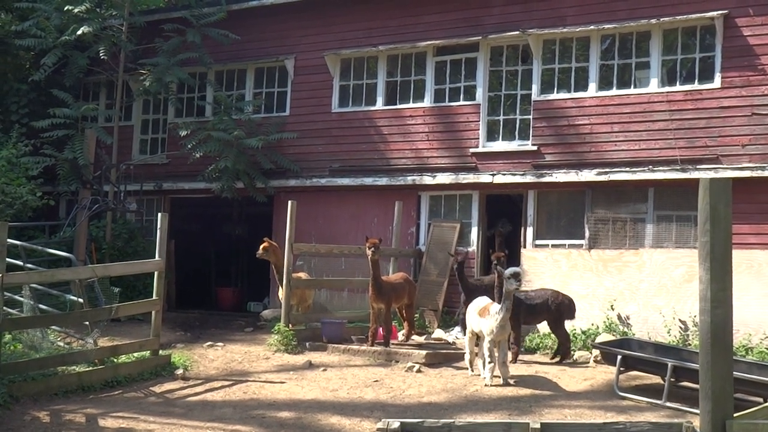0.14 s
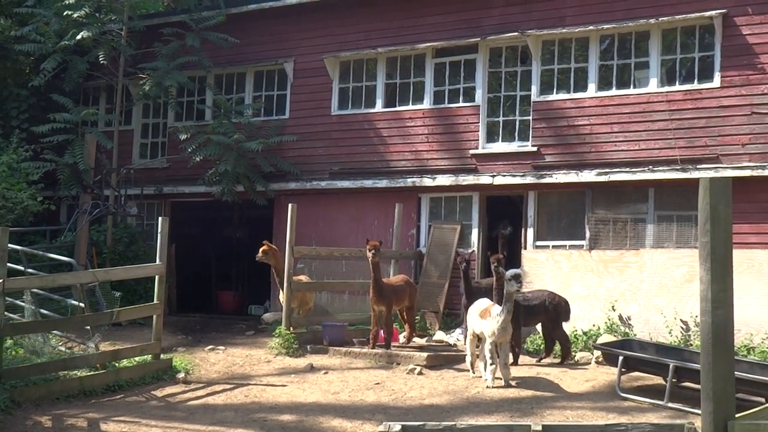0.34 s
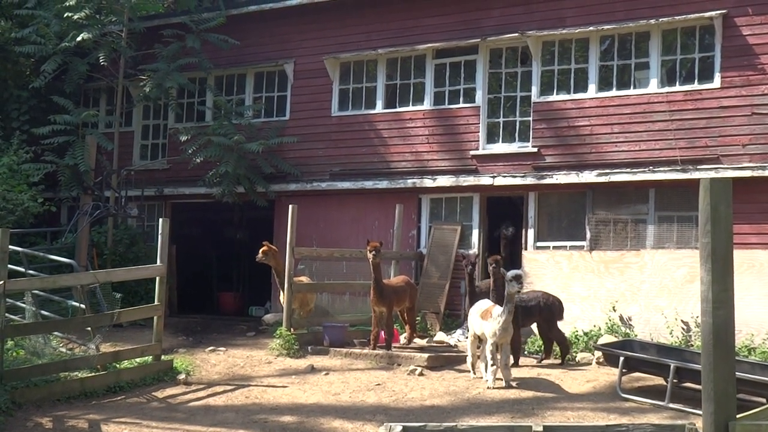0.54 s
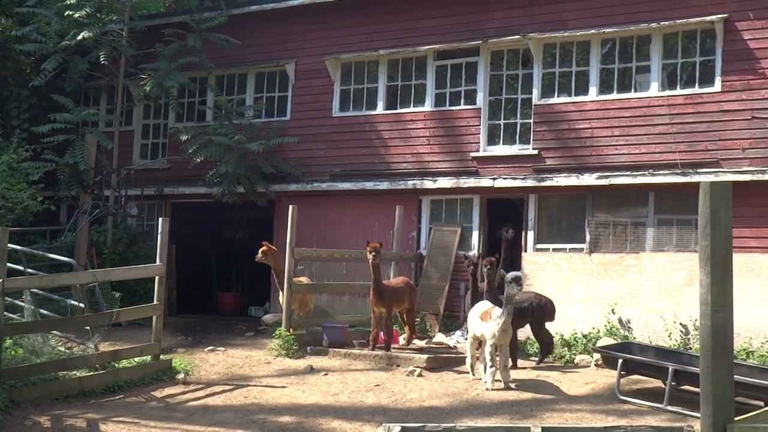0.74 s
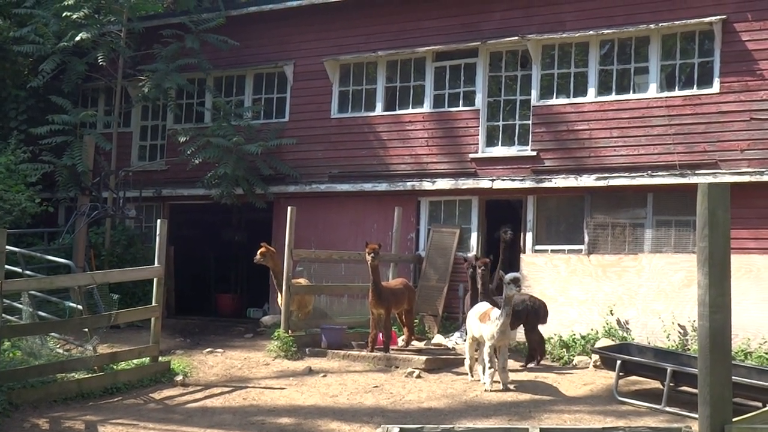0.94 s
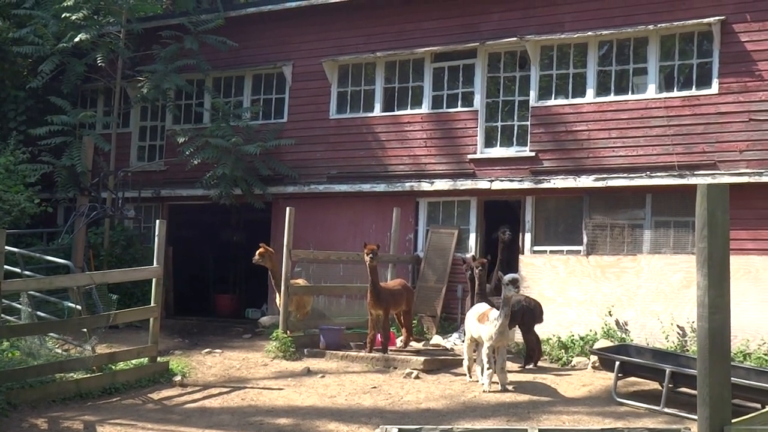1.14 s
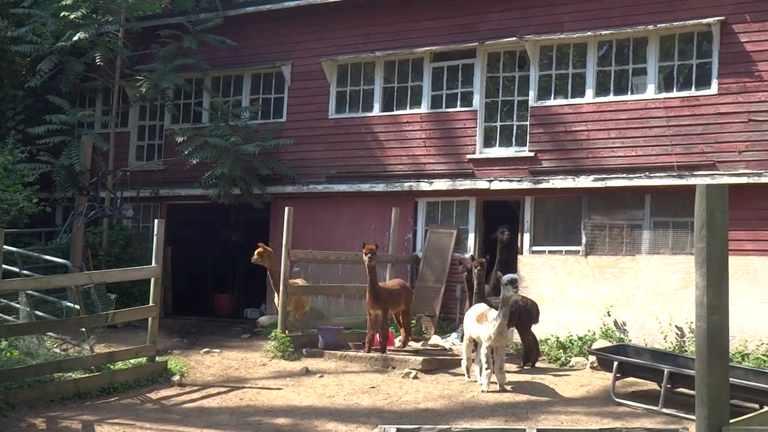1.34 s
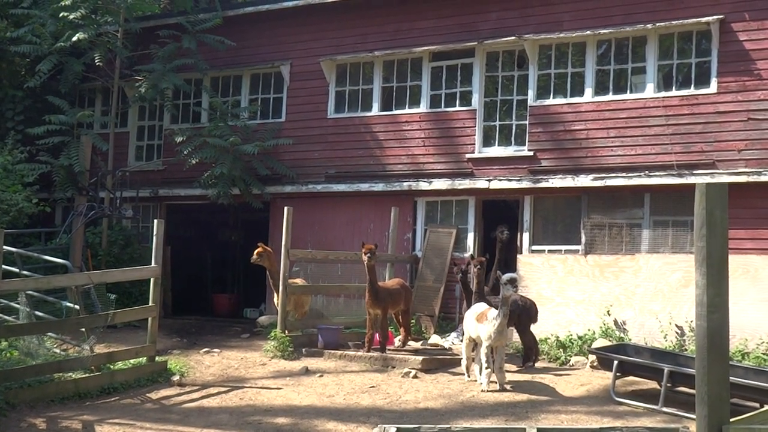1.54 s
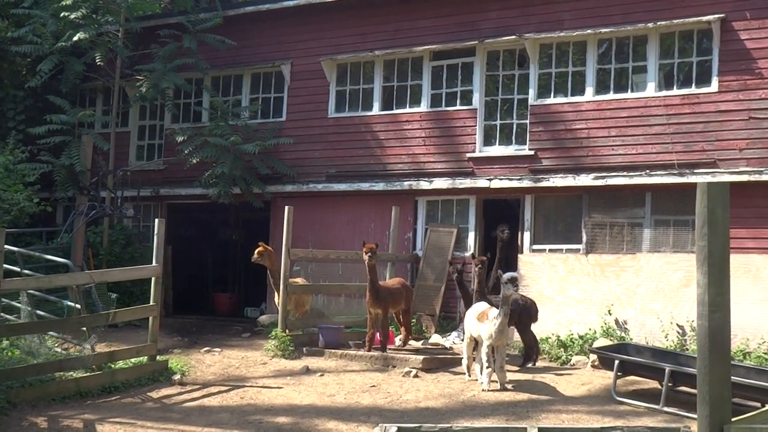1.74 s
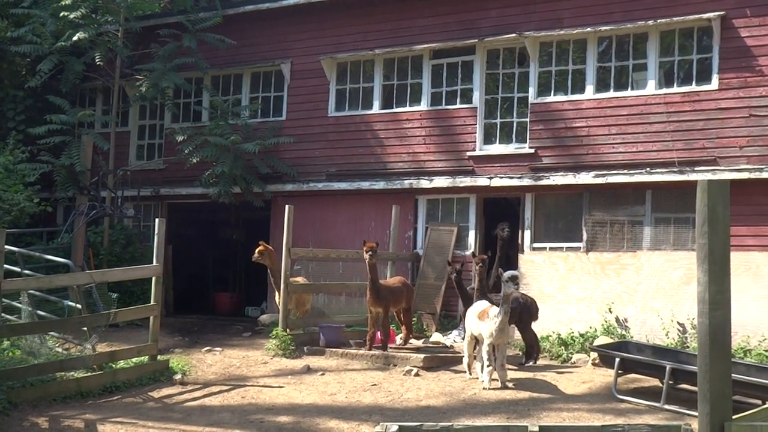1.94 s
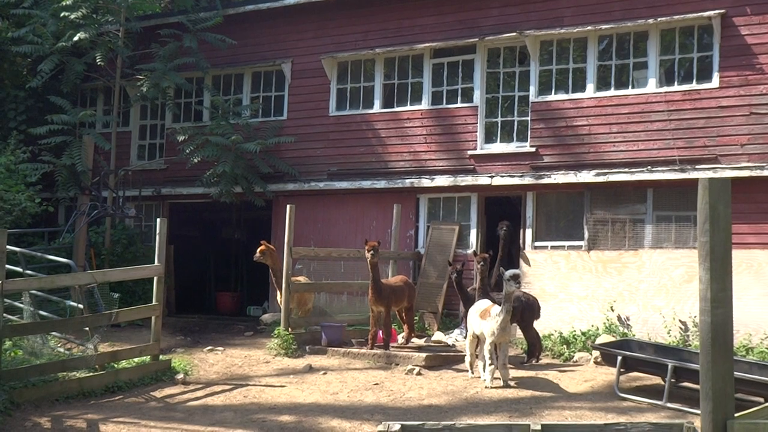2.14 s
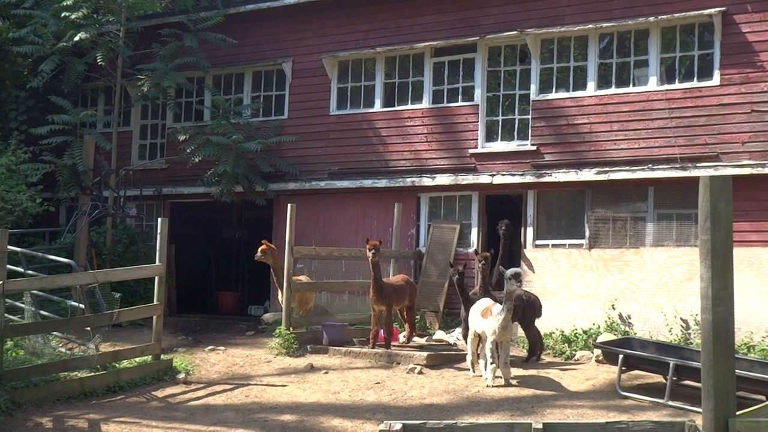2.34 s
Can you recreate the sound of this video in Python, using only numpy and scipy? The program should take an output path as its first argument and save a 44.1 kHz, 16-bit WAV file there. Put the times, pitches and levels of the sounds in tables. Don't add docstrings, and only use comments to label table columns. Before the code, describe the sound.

Loud shrill alpaca alarm calls repeat about four per second, squeaky breaths between, echoing off a barn.

```python
import sys
import numpy as np
from scipy import signal
from scipy.fft import rfft, irfft
from scipy.io import wavfile
from scipy.ndimage import map_coordinates

SR = 44100
rng = np.random.default_rng(int(sys.argv[2]) if len(sys.argv) > 2 else 0)


def natural_amplitude(level_db):
    exponent = np.asarray(level_db, float) / 20
    return 10 ** exponent


def put_to_file(sound):
    columns = np.atleast_2d(sound).T
    safe = np.clip(columns, -1, 1)
    whole_steps = np.round(safe * 32767)
    wavfile.write(sys.argv[1], SR, whole_steps.astype(np.int16))


N = 105840

# t/s, length/s, level/dB, top f/Hz, roughness/0-1
HONKS = [
    (.175, 0.15, -37, 430, 0.5),
    (.398, .135, -32.5, 400.8, .7),
    (.645, 0.13, -36, 425.4, 0.51),
    (.89, 0.13, -36, 424.8, 0.54),
    (1.14, .12, -37.5, 424.4, 0.54),
    (1.42, 0.1, -34.5, 397.7, .4),
    (1.7, .125, -35.5, 394.1, 0.42),
    (1.885, 0.14, -37, 387, 0.33),
    (2.235, .14, -37.5, 386, 0.31),
]
# t/s, length/s, level/dB, top f/Hz, roughness/0-1
WHISTLES = [
    (.197, 0.1, -21.5, 1896, 0.37),
    (0.412, 0.056, -28.5, 1796, 1.2),
    (0.488, 0.0182, -36, 1876, .95),
    (0.659, .072, -19.5, 1876, 0.35),
    (0.906, 0.0634, -19, 1849, 0.17),
    (1.161, 0.051, -20, 1825, 0.07),
    (1.437, 0.042, -24, 1816, 0.2),
    (.741, 0.0078, -39, 1852, 0.6),
    (1.218, 0.017, -32.5, 1834, 0.3),
    (1.737, 0.011, -27.5, 1811, 0.3),
]
# centre t/s, length/s, f/Hz, level/dB
CATCHES = [(.421, .016, 3600, -28), (.423, .009, 5300, -30), (.439, .017, 5350, -26),
           (.437, .012, 4200, -31), (.455, .011, 1950, -29), (.463, .015, 5150, -29),
           (.47, .008, 3550, -25), (.497, .015, 4000, -27), (.493, .01, 1950, -31), (.512, .009, 1950, -28),
           (.517, .011, 4200, -32), (.45, .05, 410, -47)]
# t/s, length/s, level/dB, top f/Hz, roughness/0-1
OPENING = [
    (.005, .165, -45, 586, 0.23),
]
# t/s, length/s, level/dB, top f/Hz, roughness/0-1
GASPS = [
    (1.27, .115, -40.5, 582, 0.01),
    (1.555, 0.12, -38, 593, 0.06),
    (2.055, 0.15, -33.5, 604, 0.02),
]
# t/s, length/s, level/dB, top f/Hz, roughness/0-1
HUMS = [
    (.32, .08, -58, 557, .1),
    (.55, 0.12, -54, 558, 0),
    (.79, 0.089, -47.5, 552.6, 0.02),
    (1.02, 0.13, -51, 545, 0.2),
]
# level/dB of the sidebands -1, 0, +1, +2, +3 times the fold rate
PARTIALS = [
    (-20, 0.5, -6.5, -13, -12),
    (-42, 1, -1, -10.5, -11.5),
    (-16, -8, -10.5, -15, -22),
    (-40, -42, -20.5, -29, -30.5),
]
# f/Hz, level/dB
HONK_THROAT = [(220, -57), (390, -2.5), (800, -5.5), (1450, -7.5), (2100, 5.5), (3300, 0), (5300, -4.5),
               (9500, -48)]
GASP_THROAT = [(600, -17.5), (1800, -6.5), (2400, -11), (3000, 8), (4800, -6), (5500, -40), (12600, -33),
               (14000, -16)]
HUM_THROAT = [(300, -20), (550, 1.5), (1100, 6), (1600, -31)]
RASP_THROAT = [(1100, -40), (1900, -56), (2900, -10), (4100, 2.5), (5800, -6.5), (7600, -11), (11500, -40),
               (14000, -29.5)]
# f/Hz, level/dB
YARD_COLOUR = [(300, -7.5), (1800, -3.5), (3700, -5.5), (5700, 0), (8000, -5), (12000, -30)]
# f/Hz, level/dB
FLOOR = [(25, -15), (60, -4), (250, -6.5), (1000, -6), (1600, -15), (3000, -13), (6000, -13.5),
         (15500, -29.5)]
# f/Hz, width/Hz, level/dB, flicker/dB
BANDS = [
    (7800, 420, -50, 1.5),
    (10185, 340, -55, 1.6),
    (14200, 1000, -68, 4),
    (127, 28.5, -56.5, 1),
    (56, 7.7, -71, 5),
]
# f/Hz, likeness/0-1
LIKE = [(60, 1), (200, 1), (500, 0.82), (1500, .8), (4000, .85), (11000, 0.91)]
# f/Hz, phase/rad
PORT_LEAD = [(40, -0.019), (150, -0.89), (400, -1.51), (1600, -1.46), (4200, -0.69), (9000, -0.31),
             (12000, -0.2)]

HONK_EDGE_S, GASP_EDGE_S, OPENING_EDGE_S = 0.023, 0.049, 0.028
HONK_SAG, GASP_SAG, HUM_SAG, OPENING_SAG = .16, .15, 0.053, 0.73
SAG_POWER, PEAK_AT = 2.6, .5
FALL_SHARE = .6
HOARSE = .55
AIR_SHARE = .55
JITTER, DRIFT, SHIMMER_DB = .024, .014, 5
ATTACK_S, RELEASE_S, FADE_DB = 0.012, .008, -0.5
ONSET_HZ, RISE_S = 1826.5, .03
WOBBLE_DB, THROB_DB = 2.2, 2.5
SIDEBANDS = range(-1, 4)
SNAP_DB, SNAP_HZ, SNAP_WIDTH_HZ, SNAP_S = -37.5, 7900, 2500, 0.0019
YARD_DB, YARD_T60_S, YARD_GAP_S, YARD_LIKE = -10.5, 1, 0.0069, 0.95
NEAR_DB, NEAR_T60_S = 13.5, 0.05
STIR_S = .00017
FLOOR_DB = -48.5
PAN_DB = -0.8


def read(table, hz):
    a = np.array(table, float)
    return np.interp(np.log(np.maximum(hz, 1)), np.log(a[:, 0]), a[:, 1])


def unit(x):
    return x / np.sqrt(np.mean(x ** 2) + 1e-20)


def shape(x, gain):
    n = x.shape[-1]
    return irfft(rfft(x) * gain(np.fft.rfftfreq(n, 1 / SR)), n)


def walk(rate):
    return unit(shape(rng.standard_normal(N), lambda f: 1 / (1 + (f / rate) ** 4)))


def alpaca(t):
    hz, gain, rough = breath(HONKS, HONK_SAG, HONK_EDGE_S, t, FALL_SHARE)
    honk, fold = buzz(hz, gain, np.maximum(rough, HOARSE), HONK_THROAT, count=19)
    opening = breath(OPENING, OPENING_SAG, OPENING_EDGE_S, t, FALL_SHARE)
    first, _ = buzz(*opening, GASP_THROAT, count=11)
    gasp, _ = buzz(*breath(GASPS, GASP_SAG, GASP_EDGE_S, t), GASP_THROAT, count=24)
    hum, _ = buzz(*breath(HUMS, HUM_SAG, GASP_EDGE_S, t), HUM_THROAT, count=3)
    return honk + whistle(fold, t) + catches(t) + first + gasp + hum


def breath(rows, sag, edge_s, t, fall=1):
    hz, gain, rough = np.full(N, 400.), np.zeros(N), np.zeros(N)
    for s, length, db, top, r in rows:
        on = (t >= s) & (t < s + length)
        u = t[on] - s
        side = np.where(u > PEAK_AT * length, fall, 1)
        arch = np.abs(2 * (u / length - PEAK_AT)) ** SAG_POWER
        hz[on] = top * (1 - sag * side * arch)
        edge = np.clip(np.minimum(u, length - u) / edge_s, 0, 1)
        gain[on] = natural_amplitude(db) * np.sin(np.pi / 2 * edge) ** 2
        rough[on] = np.clip(r, 0, 1)
    return hz, gain, rough


def buzz(hz, gain, rough, throat, count):
    hz = hz * (1 + JITTER * (0.088 + rough) * walk(113.3) + DRIFT * rough * walk(27.7))
    phase = 2 * np.pi * np.cumsum(hz) / SR
    flicker = SHIMMER_DB * walk(40)
    tone, power = np.zeros(N), np.zeros(N)
    for k in range(1, count + 1):
        size = natural_amplitude(read(throat, k * hz))
        own_flicker = natural_amplitude(rough * np.roll(flicker, rng.integers(N)))
        tone += size * own_flicker * np.cos(k * phase - 0.0603 * (k - 1) ** 2)
        power += size ** 2 / 2
    tone = tone / np.sqrt(power) * natural_amplitude(SHIMMER_DB * rough * walk(154))
    return voice(tone, phase, throat, gain, rough), phase


def voice(tone, phase, throat, gain, rough):
    puff = np.exp(0.76 * np.cos(phase)) * rng.standard_normal(N)
    air = unit(shape(puff, lambda f: natural_amplitude(read(throat, f))))
    return gain * (np.sqrt(1 - AIR_SHARE * rough) * tone + np.sqrt(AIR_SHARE * rough) * air)


def whistle(fold, t):
    hz, gain, rough = np.full(N, 1. * ONSET_HZ), np.zeros(N), np.zeros(N)
    for s, length, db, top, r in WHISTLES:
        on = (t >= s) & (t < s + length + 4 * RELEASE_S)
        u = t[on] - s
        start = min(ONSET_HZ, top - 10)
        hz[on] = top + (start - top) / (1 + (u / RISE_S) ** 4)
        attack = np.minimum(u / ATTACK_S, 1)
        release = np.exp(-np.maximum(u - length, 0) / RELEASE_S)
        gain[on] = natural_amplitude(db + FADE_DB * np.minimum(u / length, 1)) * attack * release
        rough[on] = np.clip(r, 0, 1)
    phase = 2 * np.pi * np.cumsum(hz * (1 + 0.0088 * rough * walk(100))) / SR
    wobble = natural_amplitude(WOBBLE_DB * walk(49))
    tone = np.zeros(N)
    for m, row in enumerate(PARTIALS, 1):
        for k, db in zip(SIDEBANDS, row):
            own_wobble = np.roll(wobble, rng.integers(N))
            tone += natural_amplitude(db) * own_wobble * np.cos(m * phase + k * fold + 2 * np.pi * rng.random())
    tone = tone / np.sqrt(np.sum(natural_amplitude(np.array(PARTIALS)) ** 2) / 2)
    return voice(tone, fold, RASP_THROAT, gain * natural_amplitude(THROB_DB * rough * walk(68)), rough)


def catches(t):
    rings, snaps = np.zeros(N), np.zeros(N)
    waver = np.cumsum(1 + 0.024 * walk(100)) / SR
    for s, length, hz, db in CATCHES:
        bell = np.exp(-(2 * (t - s) / length) ** 2)
        rings += natural_amplitude(db + 3) * bell * np.sin(2 * np.pi * hz * waver)
        snaps += np.exp(-np.abs(t - s) / SNAP_S)
    air = unit(shape(rng.standard_normal(N), lambda f: 1 / (1 + ((f - SNAP_HZ) / SNAP_WIDTH_HZ) ** 4)))
    return rings + natural_amplitude(SNAP_DB) * snaps * air


def pair(like):
    mid = shape(rng.standard_normal(N), lambda f: np.sqrt((1 + like(f)) / 2))
    side = shape(rng.standard_normal(N), lambda f: np.sqrt((1 - like(f)) / 2))
    return np.array([mid + side, mid - side])


def yard(x, t):
    decay = natural_amplitude(-60 * t / YARD_T60_S) + natural_amplitude(NEAR_DB - 60 * t / NEAR_T60_S)
    tail = pair(lambda f: YARD_LIKE + 0 * f) * natural_amplitude(2 * walk(60)) * decay
    gap = np.clip(t / YARD_GAP_S - .5, 0, 1)
    tail = shape(tail * gap, lambda f: natural_amplitude(read(YARD_COLOUR, f)))
    tail = tail / np.sqrt(np.sum(tail ** 2) / 2)
    stirred = map_coordinates(x, [(t + STIR_S * walk(30.04)) * SR], mode="nearest")
    return natural_amplitude(YARD_DB) * signal.fftconvolve(tail, stirred[None], axes=1)[:, :N]


def field():
    like = lambda f: np.clip(read(LIKE, f), 0, 1)
    hush = unit(shape(pair(like), lambda f: natural_amplitude(read(FLOOR, f))))
    out = natural_amplitude(FLOOR_DB + 0.4 * walk(0.67)) * hush
    for hz, width, db, flicker_db in BANDS:
        band = shape(pair(like), lambda f: 1 / (1 + ((f - hz) / width) ** 2) ** 1.02)
        out = out + natural_amplitude(db + flicker_db * walk(22)) * unit(band)
    return out


def scene():
    t = np.arange(N) / SR
    call = alpaca(t)
    pan = natural_amplitude(np.array([[PAN_DB], [-PAN_DB]]) / 2)
    return (call + yard(call, t)) * pan + field()


def low_pass(x):
    return signal.sosfilt(signal.butter(12, 15750, fs=SR, output="sos"), x)


def record(dry):
    left = shape(dry[0], lambda f: np.exp(.5j * read(PORT_LEAD, f)))
    right = shape(dry[1], lambda f: np.exp(-.5j * read(PORT_LEAD, f)))
    return low_pass(np.array([left, right]))


dry = scene()
out = record(dry)
put_to_file(out)
```